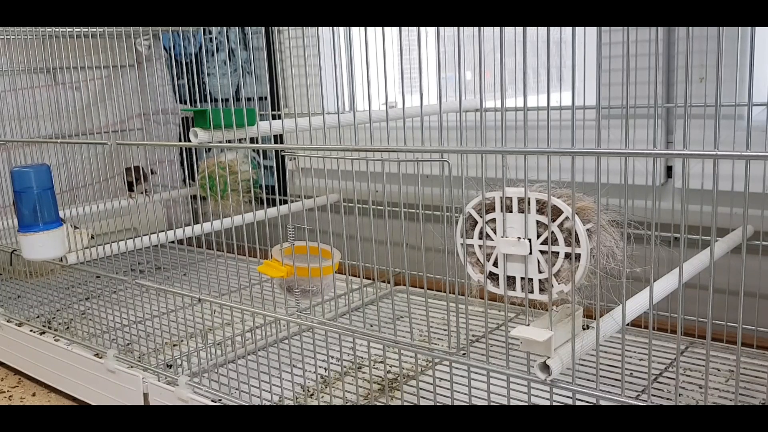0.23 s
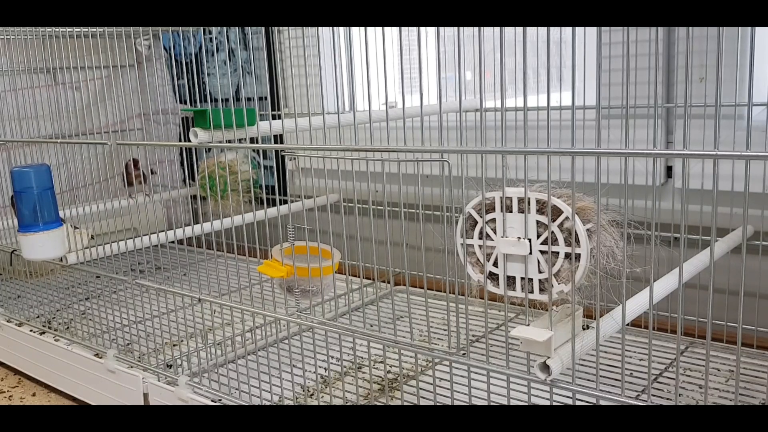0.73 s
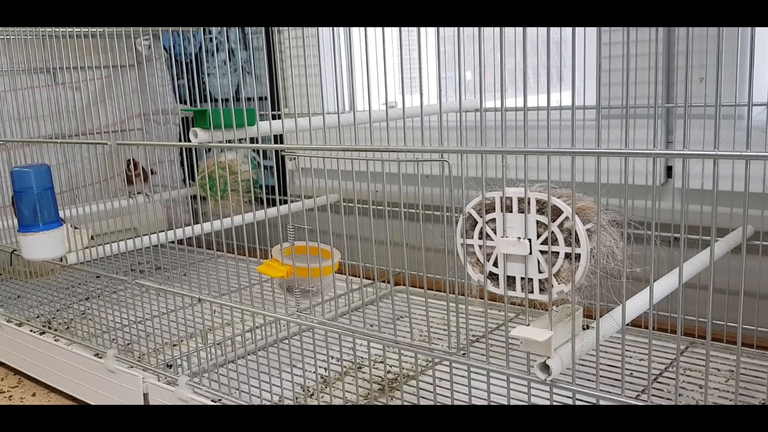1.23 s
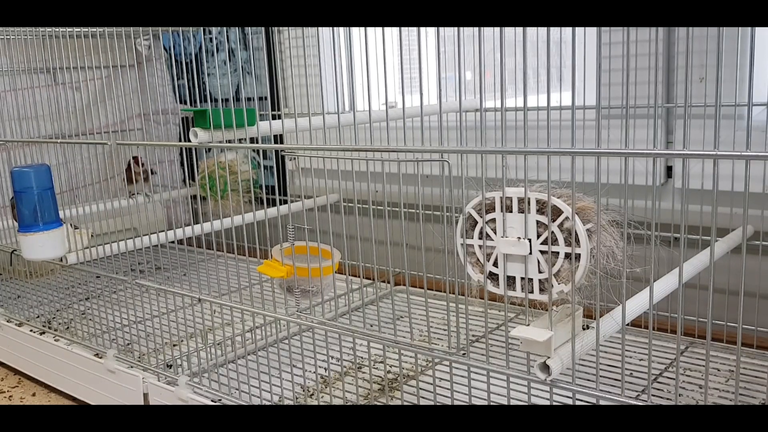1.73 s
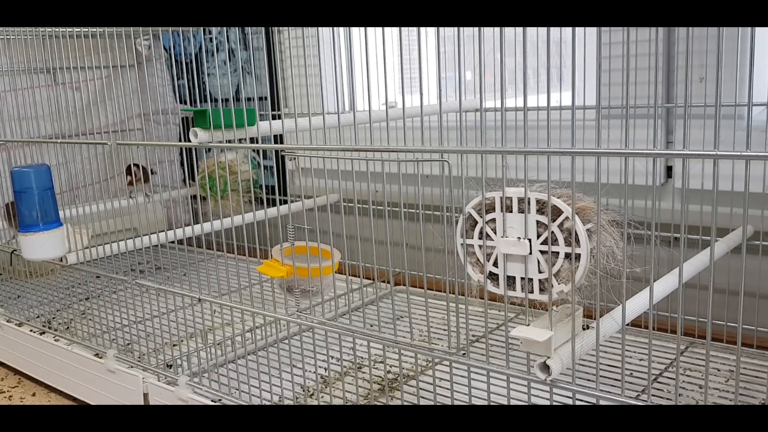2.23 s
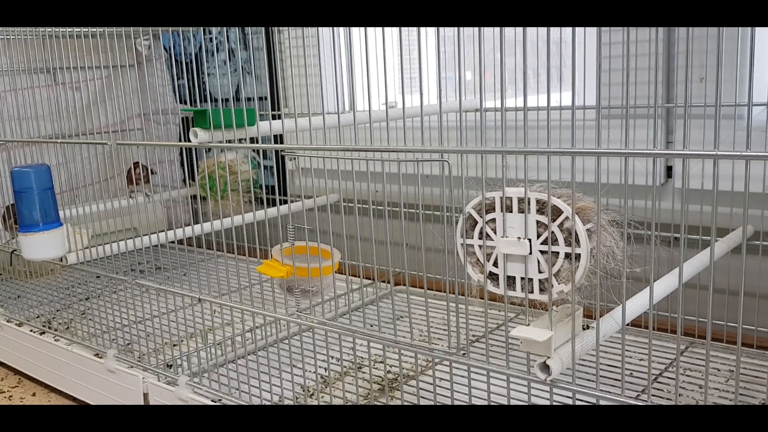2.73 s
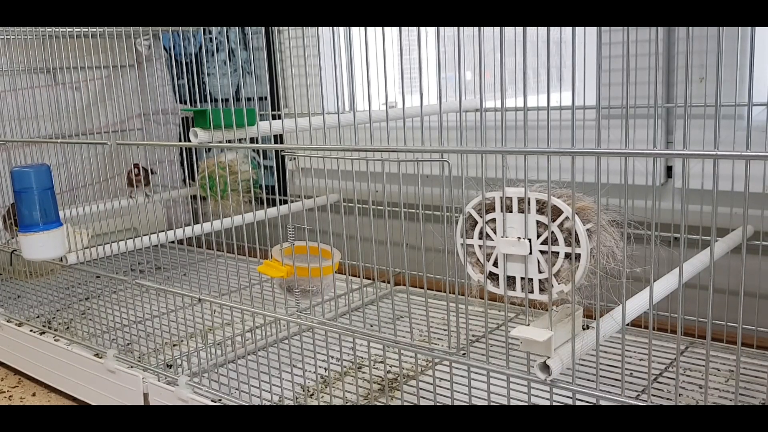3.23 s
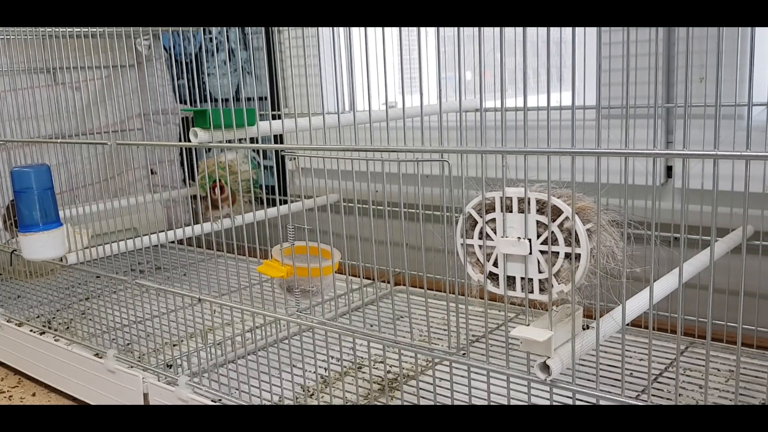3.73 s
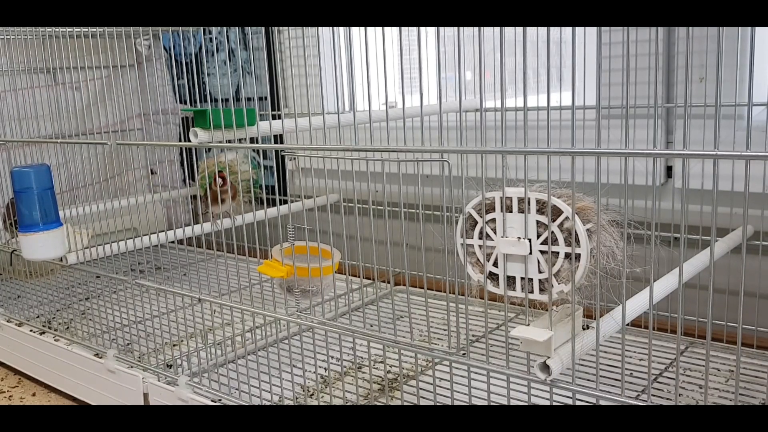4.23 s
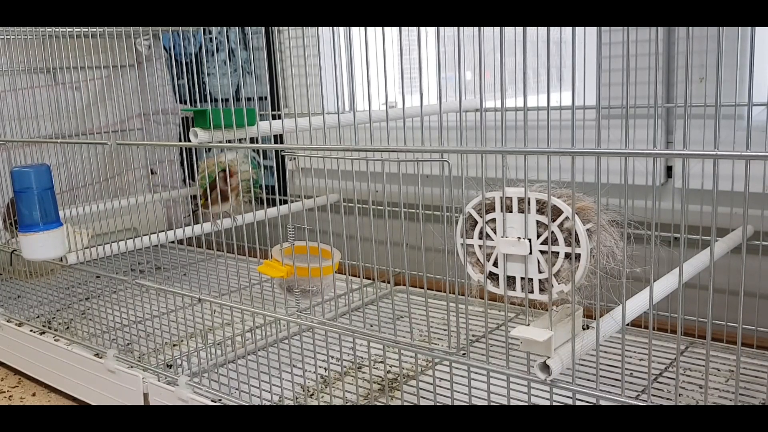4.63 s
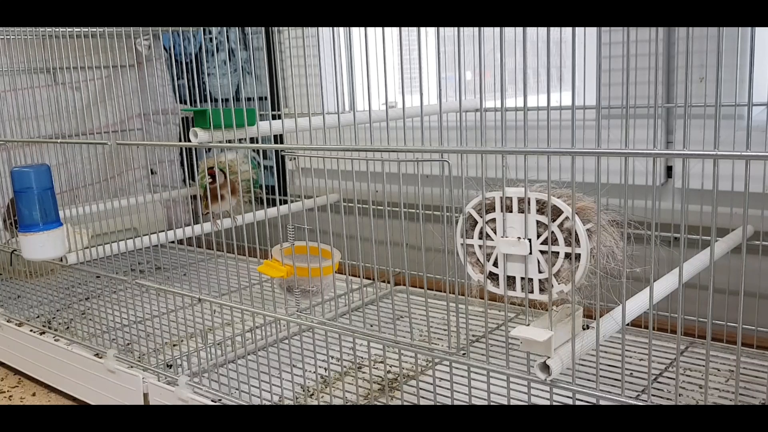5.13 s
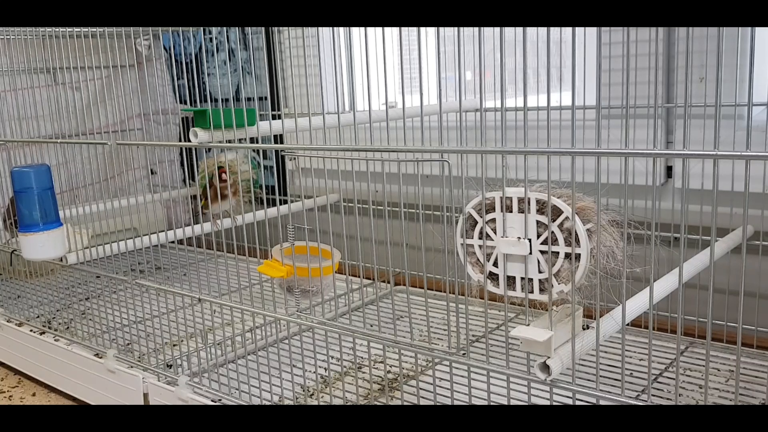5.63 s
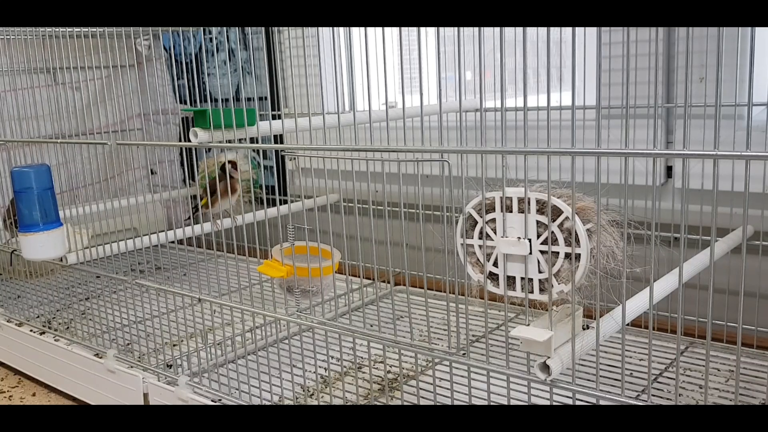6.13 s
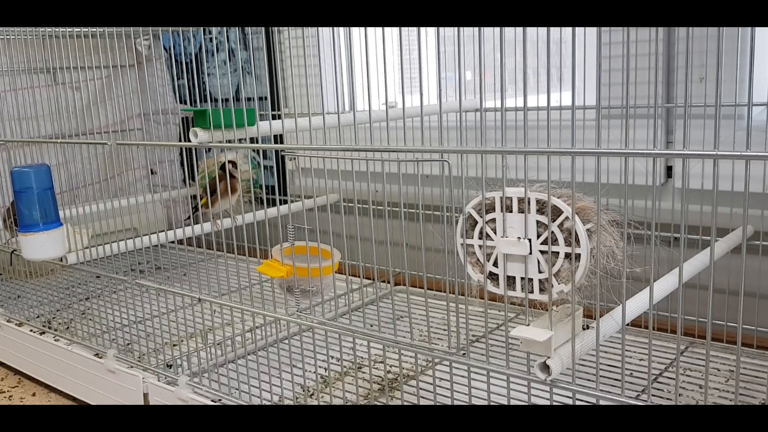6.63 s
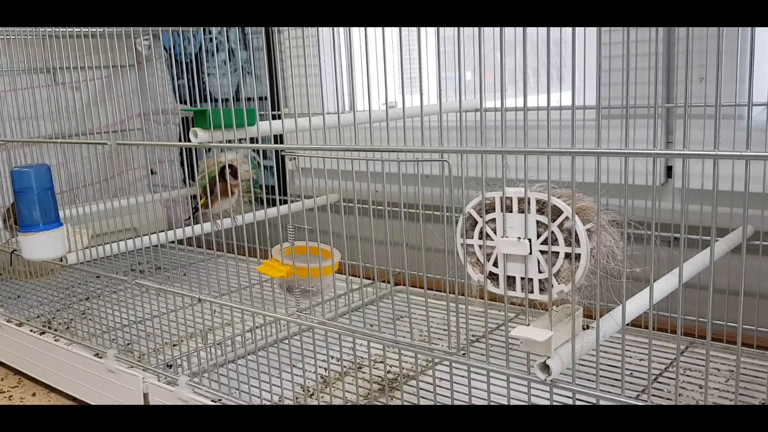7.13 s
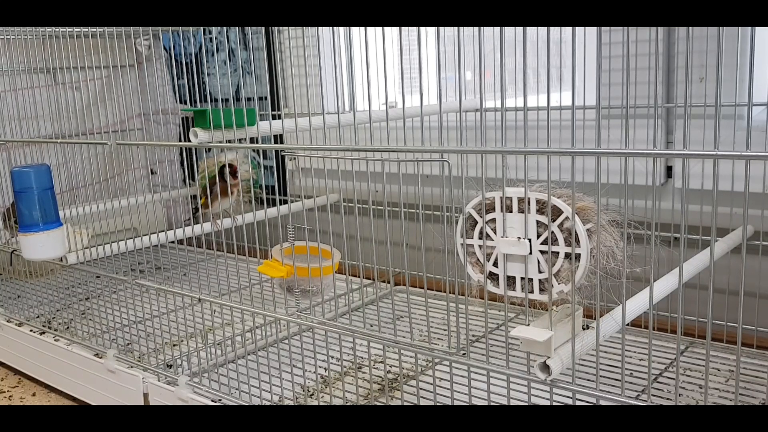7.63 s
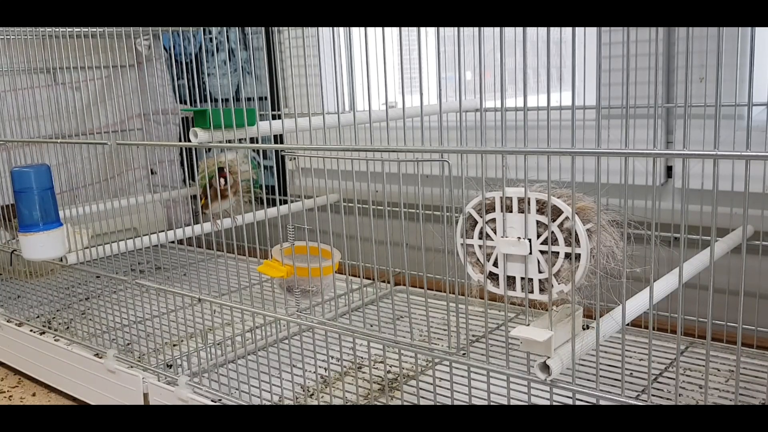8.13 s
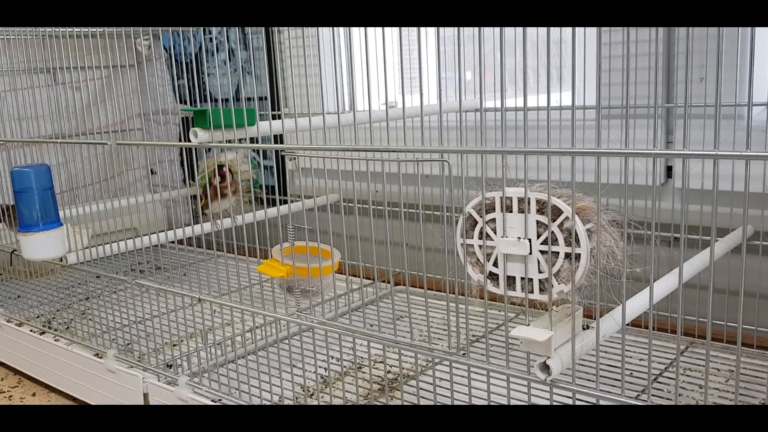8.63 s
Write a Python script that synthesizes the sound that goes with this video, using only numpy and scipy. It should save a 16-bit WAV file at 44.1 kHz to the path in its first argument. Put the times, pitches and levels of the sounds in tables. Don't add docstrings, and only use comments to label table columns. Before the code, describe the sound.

Caged finches twitter fast, bright whistled sweeps and trills in a small bare echoing room, with brief wing rustles over faint low hum.

```python
import sys
import numpy as np
from scipy import signal
from scipy.fft import rfft, irfft
from scipy.io import wavfile
from scipy.ndimage import uniform_filter1d

SR = 44100
rng = np.random.default_rng(int(sys.argv[2]) if len(sys.argv) > 2 else 0)


def generate_wav(sig):
    pcm = np.round(np.clip(np.atleast_2d(sig).T, -1, 1) * 32767).astype(np.int16)
    wavfile.write(sys.argv[1], SR, pcm)


def elevation(decibels):
    levels = np.asarray(decibels, float)
    return 10 ** (levels / 20)


N = 392490
TURBULENCE = rng.standard_normal(SR)


def evened(x):
    return x / np.sqrt(np.mean(x ** 2) + 1e-20)


def read(points, hz):
    f, value = np.transpose(points)
    return np.interp(np.log(hz + 1), np.log(f + 1), value)


def add(mix, start_s, sound):
    part = mix[round(start_s * SR):][:len(sound)]
    part += sound[:len(part)]


def coloured(x, points):
    n = x.shape[-1]
    gain = elevation(read(points, np.fft.rfftfreq(n, 1 / SR)))
    return irfft(rfft(x) * gain, n)


def syrinx(hz, reed_db=0, step_db=-2, hiss_db=-42):
    # (pitch [Hz], level [dB])
    thinning = [(2200, -19.5), (3000, -29), (4000, -31.5), (5100, -34.5), (5700, -23.5), (7000, -26.5)]
    phase = 2 * np.pi * np.cumsum(hz) / SR
    overtones = 0
    for k in (2, 3, 4, 5):
        below_nyquist = k * hz < SR / 2
        overtones = overtones + elevation((k - 5.5) * step_db) * np.sin(k * phase) * below_nyquist
    hiss = elevation(hiss_db) * np.diff(TURBULENCE[:len(hz) + 1])
    reed = elevation(read(thinning, hz) + reed_db)
    return np.sqrt(2) * (np.sin(phase) + reed * overtones) + hiss


def syllable(length_s, start_hz, middle_hz, end_hz, db, rise=0.51, fall=0.38, off_db=5.5):
    u = np.linspace(0, 1, round(length_s * SR))
    hz = start_hz * (1 - u) * (1 - 2 * u) + 4 * middle_hz * u * (1 - u) + end_hz * u * (2 * u - 1)
    throat = elevation(-off_db * np.abs(np.log2(hz / middle_hz)))
    swell = u ** rise * np.abs(1 - u) ** fall
    return elevation(db) * syrinx(hz) * evened(swell * throat)


def single_syllables():
    deep_bend = 0.56, 1.18
    deep_scoops = [(5.58, 0.027, 3640, -25), (6.015, 0.027, 3520, -22.5), (6.595, 0.0087, 2910, -34),
                   (6.711, 0.011, 2780, -35.5), (6.821, 0.022, 3150, -29.5), (7.615, 0.019, 3650, -32),
                   (7.852, 0.018, 2980, -37.5), (7.973, 0.014, 3040, -34), (8.086, 0.0106, 2990, -34),
                   (8.35, 0.04, 3635, -27.5), (8.544, 0.02, 3550, -24.5), (8.764, 0.025, 3694, -24.5)]
    scoop_bend = 0.6, 1.171
    scoops = [(1.03, 0.039, 4750, -21.5), (1.16, 0.016, 3720, -19), (2.164, 0.007, 2870, -37),
              (2.216, 0.0085, 3050, -31), (2.244, 0.048, 4710, -22.5), (2.452, 0.019, 5730, -21),
              (2.64, 0.016, 5530, -18.5), (3.155, 0.0032, 6030, -9.5), (3.799, 0.016, 2240, -40),
              (4.318, 0.017, 5690, -23), (4.634, 0.026, 3387, -25.5), (4.845, 0.016, 3260, -25),
              (5.279, 0.043, 4590, -22.5), (5.797, 0.021, 3306, -23), (6.925, 0.021, 3350, -32.5),
              (6.991, 0.01, 3367, -27)]
    rise_bend = 0.71, 1.116
    rises = [(0.158, 0.032, 3490, -29), (0.414, 0.026, 3736, -24), (0.444, 0.012, 3080, -21.5),
             (0.708, 0.017, 4396, -19), (.905, .022, 7780, -26), (1.24, 0.025, 7800, -27.5),
             (1.001, 0.019, 2806, -35.5), (1.201, 0.022, 5890, -21), (1.341, 0.02, 2356, -35.5),
             (1.515, 0.022, 3770, -24), (1.639, 0.017, 4380, -20), (1.678, 0.028, 3220, -32),
             (1.755, 0.023, 1974, -40), (1.771, .026, 3746, -24), (1.874, 0.013, 3797, -19.5),
             (2.097, 0.027, 7600, -26), (2.406, 0.013, 3135, -26.5), (2.594, 0.011, 3020, -26),
             (2.876, 0.016, 3460, -21.5), (3.068, 0.013, 3450, -21), (4.398, 0.021, 4930, -20),
             (4.447, 0.025, 3615, -25.5), (4.588, 0.018, 4820, -18.5), (5.519, 0.029, 4787, -18.5),
             (5.672, 0.015, 7580, -24.5), (6.356, 0.029, 4096, -26.5), (6.479, 0.02, 4190, -29.5),
             (6.485, .02, 7040, -43.5), (7.119, 0.0083, 3470, -33.5), (7.99, 0.026, 4210, -36.5),
             (8.305, 0.017, 4870, -18), (8.495, 0.019, 4820, -17), (8.714, 0.025, 4960, -19)]
    flick_bend = .8, 1.01
    flicks = [(1.5, 0.014, 2385, -32), (2.031, 0.024, 2822, -28.5), (4.115, 0.019, 2756, -29),
              (4.415, 0.022, 2783, -29), (5.692, 0.014, 2913, -25.5), (5.883, 0.033, 4950, -21.5),
              (5.977, 0.018, 2844, -26.5), (6.74, 0.011, 3760, -57), (1.822, 0.023, 3080, -32.5)]
    lift_bend = .87, 1.06
    lifts = [(.066, 0.0082, 2220, -29), (.243, 0.0092, 2230, -29.5), (.424, 0.0095, 2230, -31.5),
             (0.593, 0.012, 3120, -27.5), (0.619, 0.0098, 3210, -21), (1.066, 0.043, 6490, -26),
             (1.232, 0.015, 6350, -18.5), (2.254, 0.013, 4140, -21.5), (2.469, 0.043, 7670, -23.5),
             (2.652, 0.036, 7720, -22.5), (2.751, .016, 7770, -29), (2.938, 0.015, 7320, -21.5),
             (3.16, 0.019, 7500, -31.5), (4.219, 0.021, 3510, -25.5), (4.521, 0.024, 3540, -26),
             (4.587, 0.0068, 7680, -32), (4.791, 0.0093, 4350, -19.5), (5.449, 0.018, 4527, -18.5),
             (5.89, 0.012, 6560, -26), (6.111, 0.059, 7250, -40.5)]
    hook_bend = 0.73, 1.29
    hooks = [(1.879, 0.0087, 3260, -36), (4.222, 0.0028, 5880, -22.5), (4.516, 0.0045, 5530, -26.5),
             (5.892, 0.037, 6590, -28), (6.11, 0.0077, 5190, -21), (6.704, 0.031, 5150, -49.5),
             (6.744, 0.0084, 3170, -30.5), (6.912, 0.018, 4790, -38)]
    level_bend = 0.93, 1.01
    levels = [(0.226, 0.0071, 5014, -17), (.296, 0.0065, 5030, -17), (0.639, 0.0045, 6560, -12.5),
              (0.838, 0.014, 2884, -24), (0.898, 0.013, 6080, -20), (1.155, 0.016, 2835, -26),
              (1.298, 0.011, 6720, -21.5), (1.931, 0.02, 4716, -22), (2.001, 0.02, 6060, -38.5),
              (2.462, 0.0094, 6420, -25.5), (3.18, 0.034, 7670, -21), (3.806, 0.012, 2740, -30.5),
              (3.892, 0.0039, 3363, -21), (4.348, 0.021, 5220, -22.5), (5.751, 0.012, 4437, -14),
              (7.224, 0.02, 5520, -35.5), (8.436, 0.0059, 3740, -28.5), (8.457, 0.027, 6000, -41)]
    dip_bend = 1.11, 1.01
    dips = [(0.126, 0.023, 5574, -20.5), (0.307, 0.048, 5415, -22), (1.575, 0.0052, 5340, -16.5),
            (1.71, 0.0093, 4970, -27), (2.792, 0.017, 4396, -22), (2.985, 0.018, 4440, -20.5),
            (4.009, 0.017, 4960, -22), (5.225, 0.01, 7240, -20), (5.224, 0.019, 6090, -24.5),
            (5.721, 0.02, 4730, -20.5), (5.824, 0.025, 7180, -21.5), (5.942, 0.014, 4740, -19.5),
            (6.04, 0.015, 4430, -17.5), (6.217, 0.065, 5600, -39.5), (7.222, 0.015, 6820, -38.5),
            (8.588, 0.0072, 5680, -28.5)]
    stoop_bend = 1.28, .95
    stoops = [(0.115, 0.021, 6630, -20.5), (0.296, 0.044, 6540, -25), (1.408, 0.032, 6780, -22),
              (1.558, 0.038, 6750, -26.5), (1.686, 0.032, 6360, -34.5), (1.766, 0.0095, 6780, -34),
              (2.119, .065, 6750, -24), (3.99, 0.03, 5550, -30)]
    fall_bend = 1.19, .86
    falls = [(0, 0.0027, 3046, -22.5), (0, 0.0017, 4600, -19), (0.02, 0.037, 3560, -31),
             (.93, 0.027, 7450, -23), (1.257, 0.016, 7550, -27), (3.867, .008, 5300, -32),
             (3.99, .02, 6800, -30), (1.631, 0.018, 4200, -21), (7.355, 0.021, 6240, -17.5)]
    drop_bend = 0.56, 0.97
    drops = [
        (2.766, 0.009, 8210, -15),
        (2.956, .008, 8210, -16),
        (6.482, 0.05, 4400, -31),
        (6.861, 0.081, 3690, -41.5),
        (8.028, 0.008, 4420, -33),
        (8.225, .02, 3400, -38),
    ]
    slide_bend = 1.06, .87
    slides = [
        (7.468, 0.035, 5330, -23.5),
        (.004, 0.00058, 7500, -37),
        (.004, 0.00051, 10100, -32),
        (0.0076, .0008, 7600, -39),
    ]
    flat_bend = 1.03, 1.003
    flats = [
        (2.798, 0.054, 5594, -18),
        (2.994, 0.048, 5583, -17.5),
        (5.731, 0.034, 5980, -21.5),
        (5.956, .024, 6005, -21.5),
    ]
    kinds = [(deep_bend, deep_scoops), (scoop_bend, scoops), (rise_bend, rises), (flick_bend, flicks),
             (lift_bend, lifts), (hook_bend, hooks), (level_bend, levels), (dip_bend, dips),
             (stoop_bend, stoops), (fall_bend, falls), (drop_bend, drops), (slide_bend, slides),
             (flat_bend, flats)]
    return [(s, length_s, start * hz, hz, end * hz, db)
            for (start, end), rows in kinds for s, length_s, hz, db in rows]


def repeated_figures():
    # (time [s], strength [dB]), in the rattle also (pitch [share])
    trill_figure = [
        (0, 0.012, 5610, 6600, 8500, -26),
        (0.027, 0.018, 4265, 3766, 3430, -24),
        (0.042, 0.022, 5300, 5120, 5000, -16.5),
    ]
    trill = [(4.638, -2), (4.732, -1.5), (4.826, -0.5), (4.916, -1.5), (5.007, -2), (5.105, -0.9)]
    lilt_figure = [
        (0, 0.011, 4810, 6030, 7250, -17),
        (.026, 0.013, 6360, 6545, 6370, -18.5),
        (.074, 0.022, 3230, 3963, 4250, -19),
    ]
    lilts = [(0.465, -1.5), (0.583, -0.5), (0.705, -0.9), (0.827, -1.5), (0.948, 0)]
    upper_figure = [
        (.004, 0.011, 5220, 4754, 4770, -16.5),
        (.02, 0.016, 4920, 5204, 5500, -26.5),
    ]
    uppers = [(1.341, 0, 1), (1.411, 0.5, .99), (1.48, 0.3, .98), (1.554, -1, 1.03), (1.624, 1.5, 1.01),
              (1.695, -0.5, 1.04), (1.771, -0.5, .99)]
    lower_figure = [
        (0.00062, .022, 3280, 3657, 3410, -26),
    ]
    lowers = [(1.359, 5, 1), (1.428, 4, .98), (1.498, 5, 1.01), (1.565, 4, .99), (1.632, 5, 1.01),
              (1.7, 4, .98), (1.773, 4, .97), (1.84, 1.5, .99)]
    figures = [(trill_figure, trill), (lilt_figure, lilts), (upper_figure, uppers), (lower_figure, lowers)]
    notes_sung = []
    for parts, starts in figures:
        for s, more_db, *share in starts:
            for delay_s, length_s, *path_hz, db in parts:
                path_hz = np.multiply(path_hz, np.prod(share))
                notes_sung.append((s + delay_s, length_s, *path_hz, db + more_db))
    return notes_sung


def held(rows, throb_hz, swing_hz, depth, reed_db):
    s, hz, db = np.transpose(rows)
    t = np.arange(s[0], s[-1], 1 / SR)
    wander = evened(uniform_filter1d(rng.standard_normal(len(t)), size=400))
    throb = np.sin(2 * np.pi * np.cumsum(throb_hz * (1 + 0.13 * wander)) / SR)
    tone = syrinx(np.interp(t, s, hz) + swing_hz * throb, reed_db) * (1 + depth * throb)
    return s[0], elevation(np.interp(t, s, db)) * tone * signal.windows.tukey(len(t), .05)


def buzz():
    # (time [s], pitch [Hz], level [dB])
    buzz_path = [
        (3.265, 8110, -25),
        (3.3, 7300, -30.5),
        (3.345, 5854, -23.5),
        (3.42, 5220, -19.5),
        (3.52, 4420, -29),
        (3.58, 3580, -36.5),
        (3.67, 3050, -32),
    ]
    return held(buzz_path, throb_hz=269.0, swing_hz=272, depth=0.048, reed_db=-2.5)


def whistle():
    # (time [s], pitch [Hz], level [dB])
    whistle_path = [
        (5.025, 2060, -37.5),
        (5.07, 2494, -28.5),
        (5.15, 2708, -33.5),
        (5.25, 2731, -31),
        (5.37, 2744, -22),
        (5.4, 2754, -36),
        (5.44, 3055, -28),
    ]
    return held(whistle_path, throb_hz=45, swing_hz=22, depth=.25, reed_db=-14)


def perch(s, hz):
    # (from [s], to [s])
    near_s = [(.06, .08), (.22, .3), (.42, .43), (.835, .845), (1.15, 1.158), (1.34, 1.95), (2.11, 2.12),
              (2.76, 2.77), (3.15, 3.165), (3.8, 3.81), (4.11, 4.12), (4.635, 5.16), (5.44, 5.53),
              (5.745, 5.76), (6.03, 6.05), (7.3, 7.5), (8.3, 8.75)]
    far_s = 6.3, 7.2
    if far_s[0] < s < far_s[1]:
        return 3
    if any(start < s < end for start, end in near_s):
        return 4
    return int(hz > 4400)


def room(x, direct_db, early, early_s):
    # (freq [Hz], t60 [s])
    walls = [(2000, 1), (5000, 0.63), (14000, 0.59)]
    taps = np.zeros((2, SR))
    slots = np.arange(90, SR - 12, 12)
    jitter = rng.integers(0, 12, (2, (SR - 91) // 12 + 1))[:, :(SR - 103) // 12 + 1]
    at = slots + jitter
    np.put_along_axis(taps, at, rng.choice([-1., 1.], at.shape), 1)
    taps *= 1 + early * np.exp(-np.arange(SR) / SR / early_s)
    hz, t, z = signal.stft(taps, SR, nperseg=128)
    decay = elevation(-60 * t / read(walls, hz)[:, None])
    tail = signal.istft(z * decay, SR, nperseg=128)[1]
    tail /= np.linalg.norm(tail, axis=1, keepdims=True)
    tail[[0, 1], [0, 4]] = elevation(direct_db)
    return signal.fftconvolve(x[None], tail, axes=1)[:, :N]


def cage():
    # (time [s], length [s], level [dB])
    rustles = [(0, 0.03, -48), (1.089, 0.25, -50.5), (2.113, 0.17, -51.5), (3.409, 0.18, -52),
               (4.806, 0.23, -45.5), (3.15, 0.33, -58), (5.153, 0.43, -59), (5.956, 0.14, -54),
               (6.171, 0.11, -56), (6.484, 0.1, -68.5), (6.75, 0.21, -94), (7.08, 0.23, -53)]
    # (freq [Hz], level [dB])
    feathers = [(60, 5), (300, 18.5), (4000, -7.5), (15000, -30)]
    # (time [s], level [dB])
    hops = [
        (3.447, -21),
        (3.868, -36),
        (4.218, -51),
        (4.321, -34.5),
    ]
    beats = np.zeros(N)
    noise = evened(coloured(rng.standard_normal(N), feathers))
    for s, length_s, db in rustles:
        t = np.arange(0, length_s, 1 / SR)
        wing_beat = 1 - .5 * np.cos(2 * np.pi * 21 * t)
        add(beats, s, elevation(db) * wing_beat * signal.windows.tukey(len(t), .3))
    out = beats * noise
    t = np.arange(0, .006, 1 / SR)
    for s, db in hops:
        add(out, s, elevation(db) * rng.standard_normal(len(t)) * np.exp(-t / 0.00042))
    return out


def spells(rows):
    out = np.zeros(N)
    for s, length_s, db in rows:
        add(out, s, elevation(db) * signal.windows.tukey(round(length_s * SR), .3))
    return out


def gusts():
    # (time [s], length [s], level [dB])
    puffs = [
        (1.1, 0.34, -51.5),
        (2.13, 0.15, -51.5),
        (3.45, 0.55, -58),
    ]
    # (freq [Hz], level [dB])
    puff_spectrum = [(25, 0.5), (130, -8), (300, -12.5), (1000, -51)]
    return spells(puffs) * evened(coloured(rng.standard_normal(N), puff_spectrum))


def air():
    # (freq [Hz], density [dB per Hz])
    air_spectrum = [(20, -4), (45, 2), (250, -5.5), (600, -18), (2000, -24.5), (15000, -18)]
    # (freq [Hz], likeness [0-1])
    likeness = [(30, .94), (150, .78), (400, .35), (1000, 0)]
    # (freq [Hz], rms level [dB])
    mains = [
        (100, -83),
        (200, -60),
    ]
    air_db = -63.5
    left, other = rfft(rng.standard_normal((2, N)))
    hz, t = np.fft.rfftfreq(N, 1 / SR), np.arange(N) / SR
    same = np.clip(read(likeness, hz), 0, 1)
    pair = irfft(np.array([left, same * left + np.sqrt(1 - same ** 2) * other]), N)
    hum = sum(np.sqrt(2) * elevation(db) * np.sin(2 * np.pi * f * t) for f, db in mains)
    waver_db = 2.0 * evened(uniform_filter1d(rng.standard_normal(N), size=4000))
    balance_db = [[1.5], [-1.5]]
    return elevation(air_db + 6.5) * evened(coloured(pair, air_spectrum)) + hum * elevation(balance_db) * elevation(waver_db)


def whine():
    # (time [s], length [s], level [dB])
    whine_spells = [
        (1.3, .85, -71),
        (2.25, .2, -75),
        (2.6, .23, -74),
    ]
    whine_hz = 996
    flicker = evened(uniform_filter1d(rng.standard_normal(N), size=900))
    tone = np.sin(2 * np.pi * whine_hz * np.arange(N) / SR)
    return np.sqrt(2) * spells(whine_spells) * elevation(5.6 * flicker) * tone


def masked(x, patchy_db=4):
    # (freq [Hz], level [dB])
    heard_db = [(400, -38), (1500, -40), (6600, -39), (7800, -55), (9200, -37.5), (10300, -54.5),
                (12000, -74), (14800, -38)]
    hz, _, z = signal.stft(x, SR, nperseg=2048, noverlap=1024)
    band = uniform_filter1d((abs(z) ** 2).mean(0), size=9, axis=0)
    patches = rng.standard_normal((len(hz) // 10 + 1, z.shape[2]))
    patches = evened(uniform_filter1d(patches, size=3, axis=1))
    patches = np.repeat(patches, 10, axis=0)[:len(hz)]
    loudest = uniform_filter1d(band.max(0), size=3, origin=1)
    threshold_db = read(heard_db, hz)[:, None] + patchy_db * patches
    kept = (band > elevation(2 * threshold_db) * loudest) | (hz < 260)[:, None]
    return signal.istft(z * kept, SR, nperseg=2048, noverlap=1024)[1][:, :N]


def scene():
    direct_db = [
        -9,
        -11.5,
        -8.5,
        -10,
        -10.5,
    ]
    early = [0.98, 1.5, 1.4, 1, 1.57]
    early_s = [0.072, .055, 0.053, 0.16, 0.035]
    perches, wings = np.zeros((len(early), N)), cage()
    for s, *row in single_syllables() + repeated_figures():
        middle_hz = row[2]
        add(perches[perch(s, middle_hz)], s, syllable(*row))
    add(perches[2], *buzz())
    add(perches[2], *whistle())
    perches[2] += 6.63 * np.gradient(wings)
    birds = sum(room(*seat) for seat in zip(perches, direct_db, early, early_s))
    return birds + elevation(-11.5) * wings + air() + gusts()


def top_cut(x):
    return signal.sosfilt(signal.butter(12, 15130, fs=SR, output="sos"), x)


def record(dry):
    # (freq [Hz], level [dB])
    capsule = [(8000, 1), (12500, 0.5), (14800, -9.5)]
    limited = .6 * np.tanh(dry / .6)
    lowpass = signal.firwin(511, 15000, window=("kaiser", 9), fs=SR)[None]
    heard = signal.oaconvolve(coloured(limited, capsule), lowpass, "same")
    return top_cut(masked(heard) + whine())


dry = scene()
out = record(dry)
generate_wav(out)
```